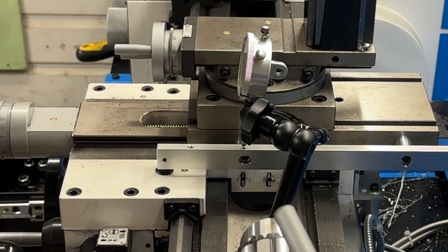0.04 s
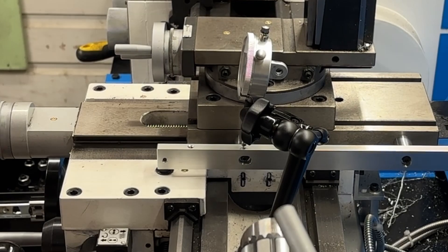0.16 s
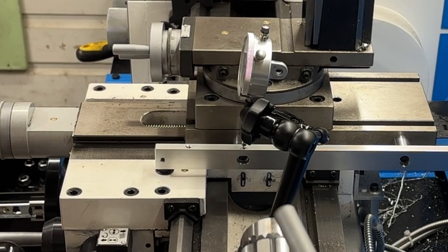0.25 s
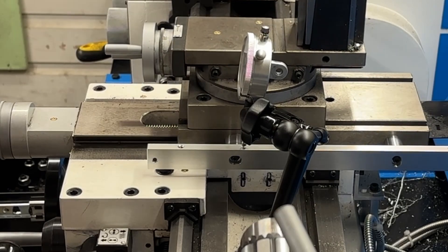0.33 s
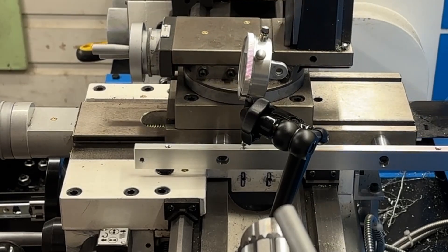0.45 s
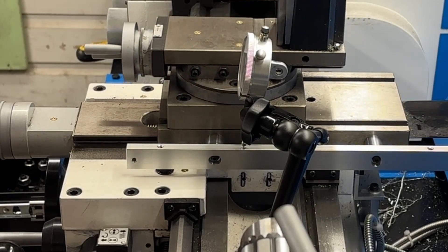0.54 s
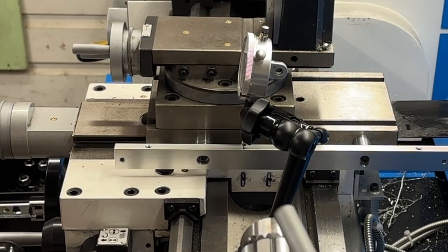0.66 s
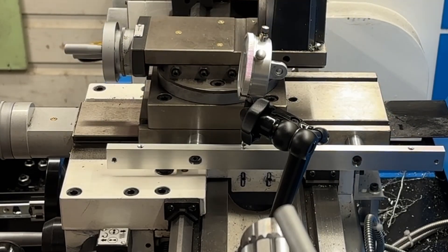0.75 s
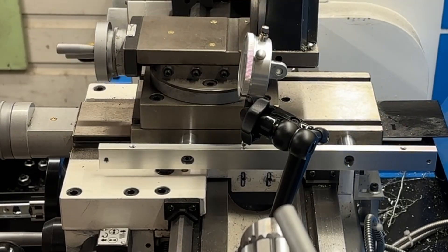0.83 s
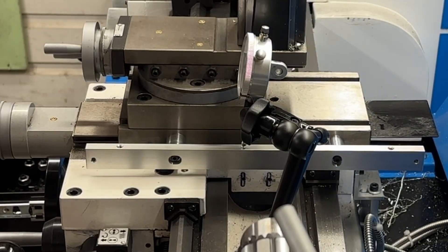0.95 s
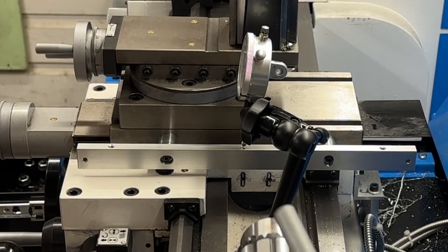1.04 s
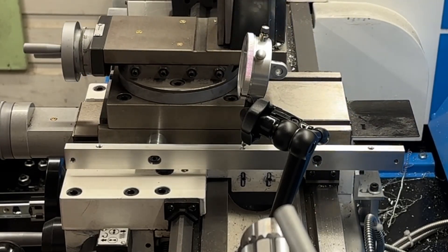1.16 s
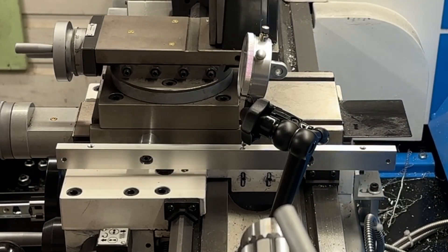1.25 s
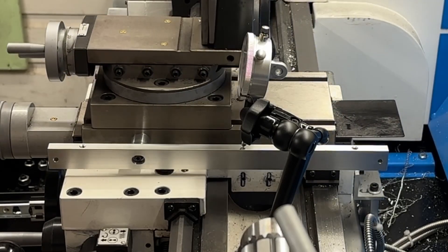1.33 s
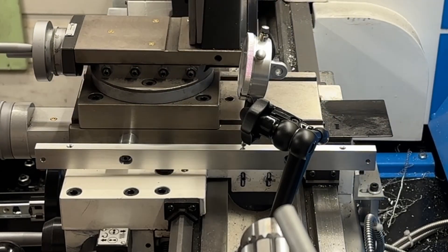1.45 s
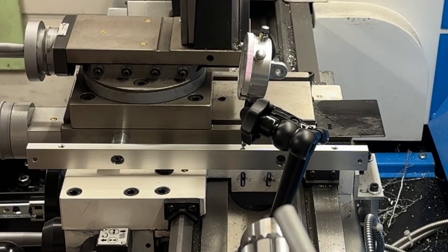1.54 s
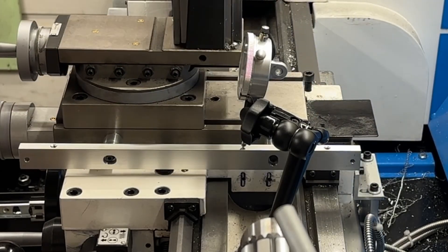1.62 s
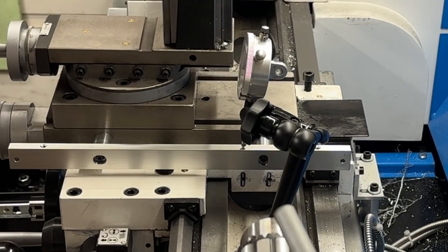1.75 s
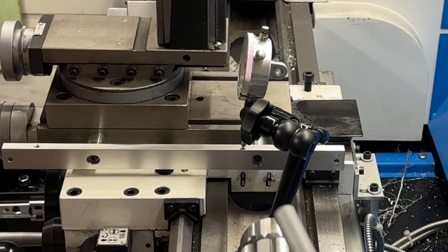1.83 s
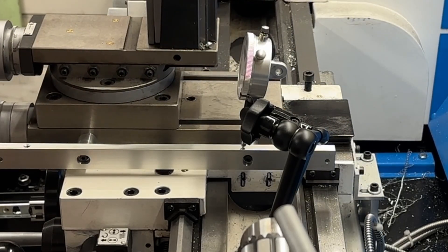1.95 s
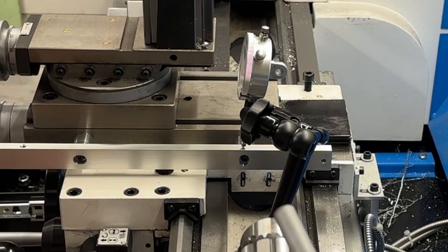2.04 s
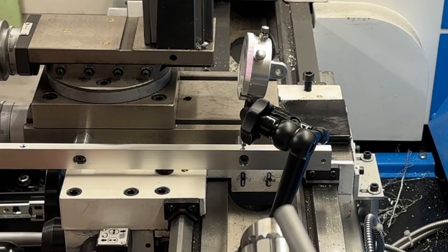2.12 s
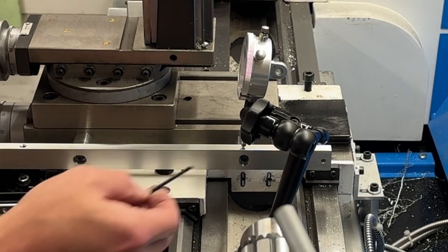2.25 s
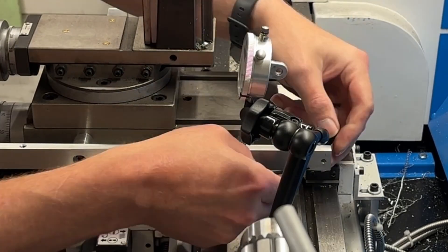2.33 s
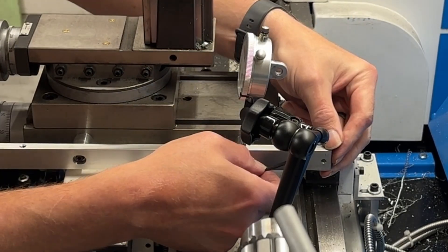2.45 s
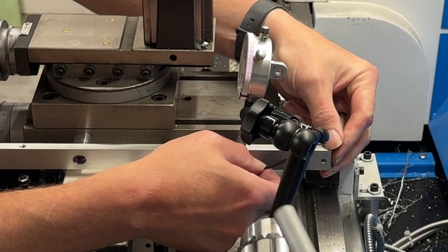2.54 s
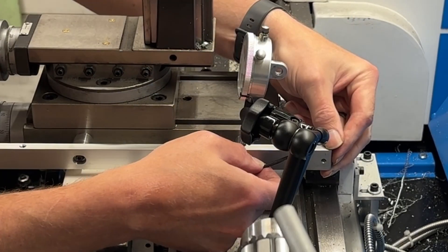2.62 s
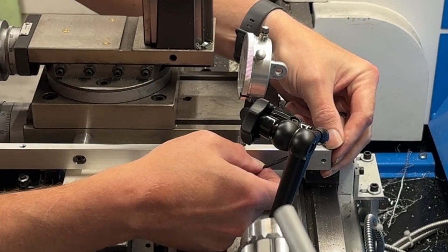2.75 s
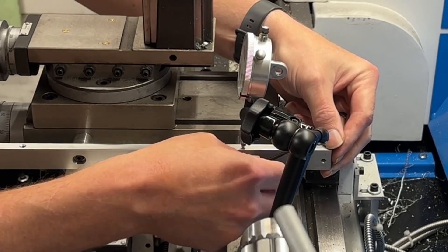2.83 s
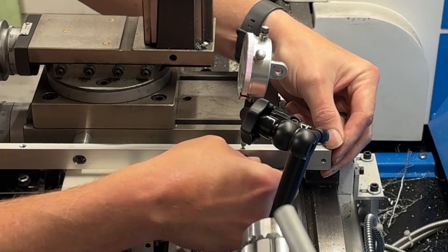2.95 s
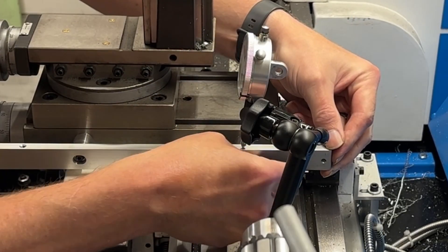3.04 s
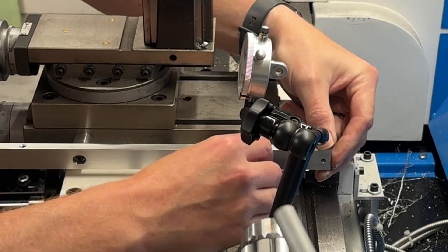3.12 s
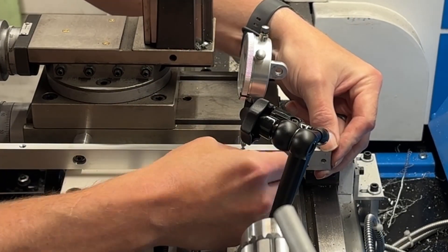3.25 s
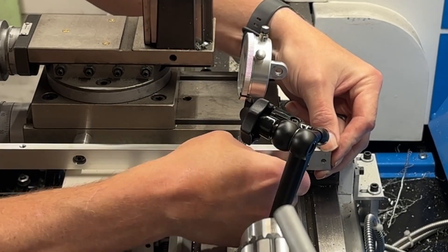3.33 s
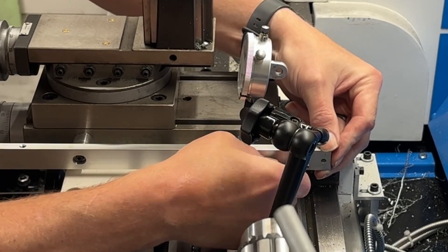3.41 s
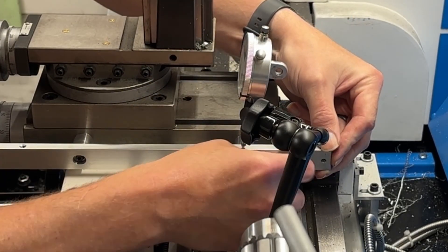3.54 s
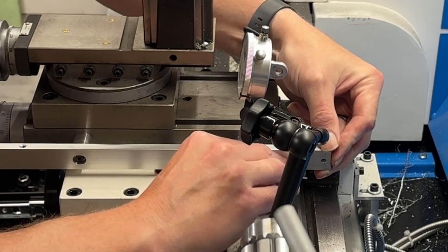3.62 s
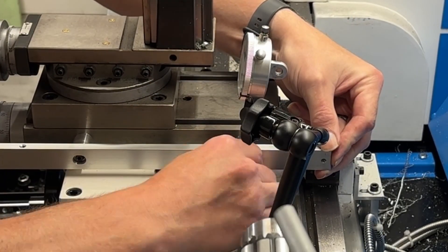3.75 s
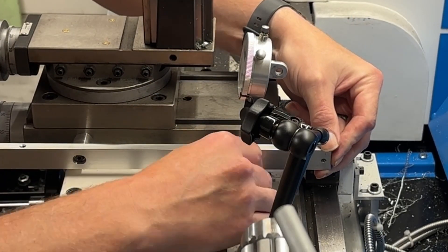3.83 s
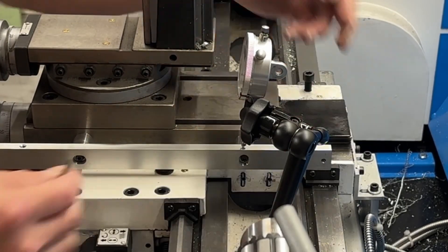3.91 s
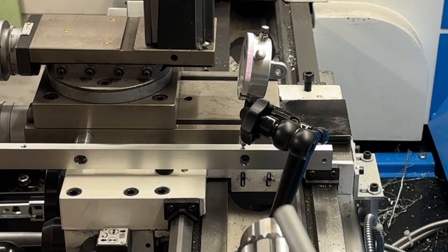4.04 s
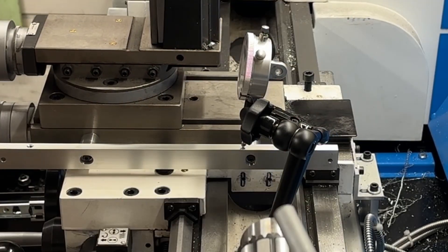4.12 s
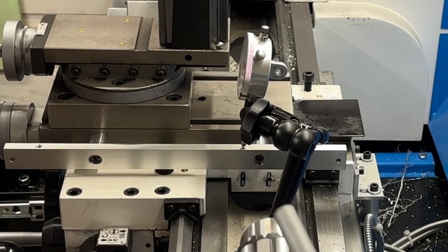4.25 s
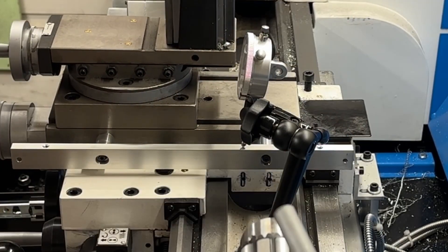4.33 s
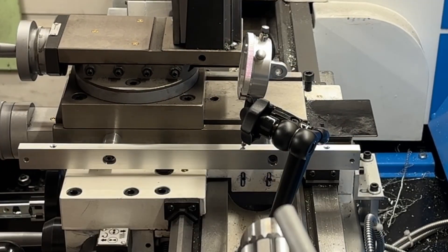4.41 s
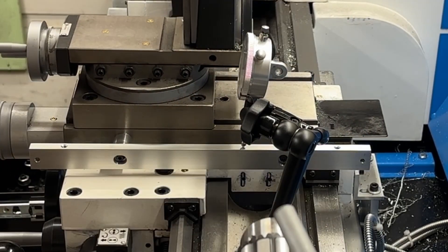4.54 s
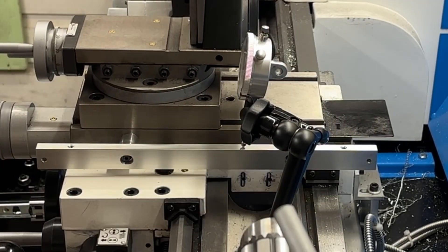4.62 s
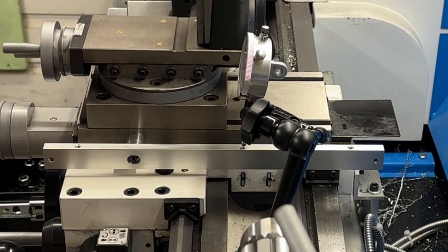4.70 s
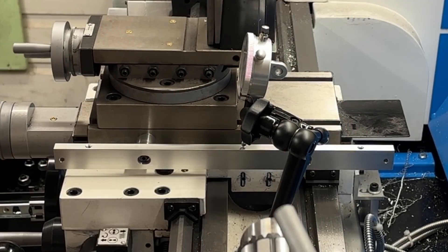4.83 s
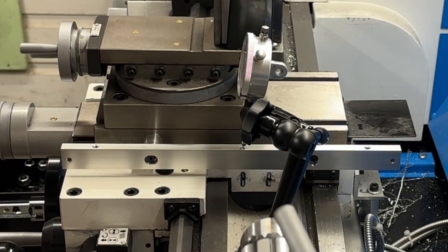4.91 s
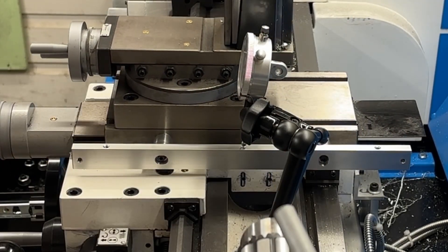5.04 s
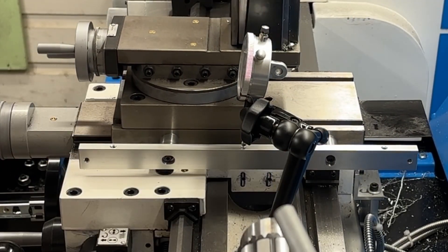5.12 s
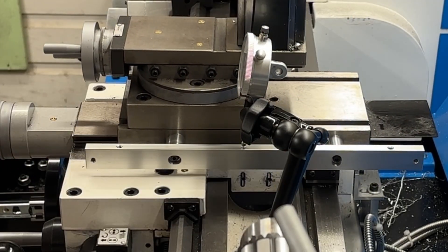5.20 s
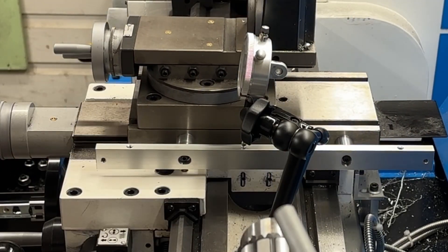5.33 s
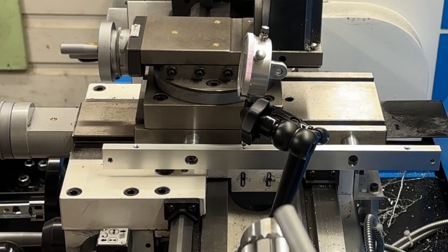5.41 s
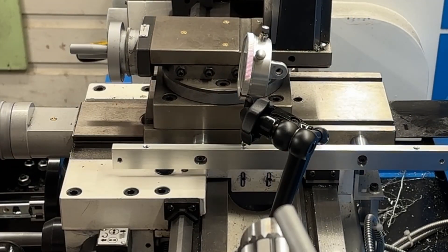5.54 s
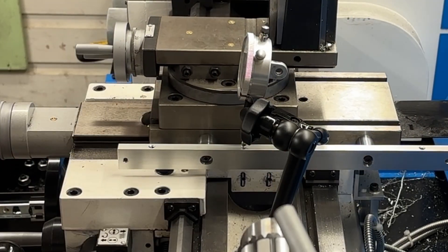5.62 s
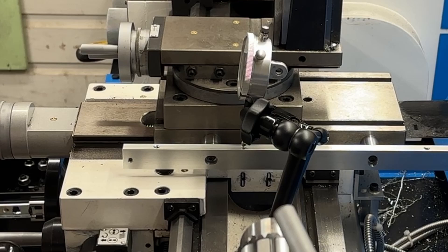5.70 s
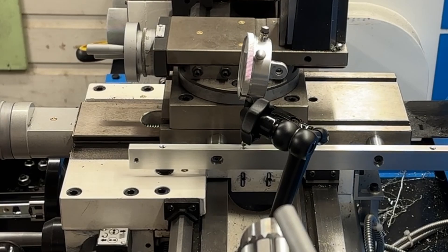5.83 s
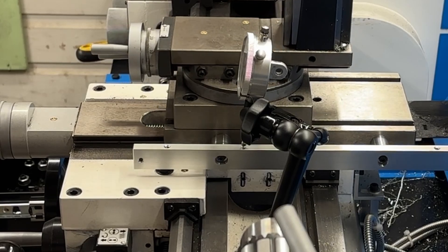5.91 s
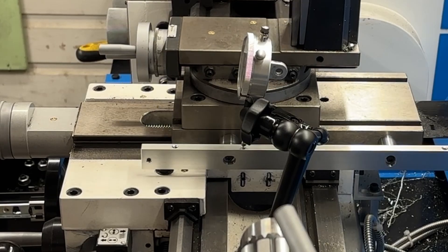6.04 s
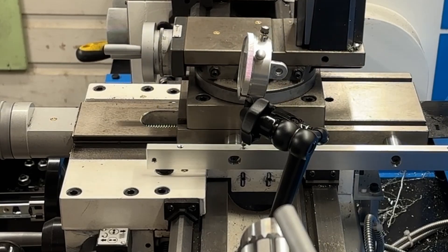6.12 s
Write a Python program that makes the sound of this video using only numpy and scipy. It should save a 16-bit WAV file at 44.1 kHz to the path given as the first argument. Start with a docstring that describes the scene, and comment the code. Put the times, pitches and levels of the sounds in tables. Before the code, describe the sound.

Close up in a small, dry workshop, a heavy lathe slide moves along its bed with a low, fast-fluttering rumble, faint rasp and small ticks. It stops, and a sharp steel clack bounces briefly with a short bright ring. Hands with a small key leave only tiny scuffs and ticks over a faint drone. Two small clicks, then the slide rumbles back, slightly grittier, with soft jolts.

```python
"""In a small workshop, close to the microphone, a lathe slide is moved along its ways.
Its drive rumbles through the iron bed in fast throbs; the ways rasp and hiss, with jolts and ticks.
Then a steel part clacks and bounces, and hands with a small key leave quiet scuffs and ticks.
The slide is moved back, crunching over grit. Shaped noise makes the friction and blows, sines the
steel ring and bed thuds; a low drone, a thin whine and faint air lie behind throughout."""
import sys
import numpy as np
from scipy import signal
from scipy.fft import rfft, irfft, next_fast_len
from scipy.io import wavfile
from scipy.ndimage import uniform_filter1d

SR = 44100
rng = np.random.default_rng(int(sys.argv[2]) if len(sys.argv) > 2 else 0)


def master_out(mix):
    """Clip the mix to full scale and print it as 16-bit PCM to the path in sys.argv[1]."""
    frames = np.transpose(np.atleast_2d(mix))
    ceiling = np.clip(frames, -1, 1)
    pcm = np.round(ceiling * 32767).astype(np.int16)
    wavfile.write(sys.argv[1], SR, pcm)


N = 271901
T = np.arange(N) / SR
LEAD_S = .04  # room for the swell ahead of the peak of a burst or thud

# spectrum of grit between the ways: [hz, relative level_db]
GRIT_SPECTRUM = [(2500, -15), (4200, 7), (6000, -3.5), (7500, 2), (9000, -14), (13000, -7), (15000, -7.5)]


def amp(db):
    """Decibels to gain."""
    return 10 ** (np.asarray(db) / 20)


def unit(x):
    """Scales to rms 1."""
    return x / np.sqrt(np.mean(x ** 2) + 1e-20)


def read(points, hz):
    """Reads a spectrum table on a log-frequency axis."""
    f, value = np.transpose(points)
    return np.interp(np.log(hz + 1), np.log(f + 1), value)


def bins(x):
    """The frequencies of the spectrum of x."""
    return np.fft.rfftfreq(x.shape[-1], 1 / SR)


def colour(x, db_at):
    """Filters x by a function from Hz to dB."""
    size = next_fast_len(x.shape[-1] + 2048)
    gain = amp(db_at(np.fft.rfftfreq(size, 1 / SR)))
    return irfft(rfft(x, size) * gain, size)[..., :x.shape[-1]]


def noise(db_at, size=N):
    """Stereo noise of rms 1, alike in both channels in the bass and more diffuse above."""
    # stereo width: [hz, side_minus_mid_db]
    stereo_width = [(30, -14), (100, -23), (200, -16), (380, -10), (690, -4.5), (1300, -1.5), (4300, -5.5),
                    (8000, -3), (14000, 0)]
    white = rng.standard_normal((2, next_fast_len(size)))
    hz = bins(white)
    mid, side = rfft(white)
    side = side * amp(read(stereo_width, hz))
    spectrum = np.array([mid + side, mid - side]) * amp(db_at(hz))
    return unit(irfft(spectrum, white.shape[1])[:, :size])


def wander(hz):
    """A smooth random curve of rms 1 that changes up to about hz times a second."""
    return unit(colour(rng.standard_normal(N), lambda f: -10 * np.log10(1 + (f / hz) ** 6)))


def add(mix, s, sound):
    """Mixes a sound in at time s."""
    part = mix[:, max(round(s * SR), 0):][:, :sound.shape[-1]]
    part += sound[..., :part.shape[1]]


def burst(db_at, rise, t60, lead, hold=0):
    """A puff of noise that swells to its peak after lead seconds, holds and dies away."""
    t = T[:12288] - lead
    swell = np.exp(-abs(t) / rise)
    decay = np.exp(-np.log(1000) * (t - hold).clip(0) / t60)
    return noise(db_at, size=len(t)) * np.where(t < 0, swell, decay)


def throb(turns, depth, sharp, uneven_db):
    """One swell for each turn of the drive, each of its own strength; mean power 1."""
    strengths = amp(uneven_db * np.clip(rng.standard_normal(512), -2, 2))
    strength = strengths[np.round(turns).astype(int) % 512]
    swell = unit(strength * np.exp(sharp * (np.cos(2 * np.pi * turns) - 1)))
    depth = np.clip(depth, 0, 1)
    return unit(1 - depth + depth * swell)


def steady(x, window, share):
    """Evens out the slow swells of a noise, as a constant push does."""
    power = uniform_filter1d((x ** 2).mean(0), int(window * SR))
    return unit(x / (abs(power) + 1e-6) ** (np.clip(share, 0, 1) / 2))


def slide(hz):
    """The broad resonances of the slide in dB; they colour its blows and scrapes."""
    # resonances of the slide: [centre_hz, width_hz, peak_db]
    resonances = [(646, 51.34, 6), (955, 97, 5), (1260, 70, 7.5), (1551, 300, 4.5), (2660, 67, 4),
                  (2820, 17, 6), (4340, 90, 7), (4950, 100, 6.5)]
    return sum(db / (1 + (2 * (hz - centre) / width) ** 2) for centre, width, db in resonances)


def steel_puff(tilt_db, rise, hold, t60):
    """The dead sound of steel meeting the slide, tilted duller or brighter by tilt_db per octave."""
    # spectrum of the contact: [hz, relative level_db]
    contact_spectrum = [(40, -7), (160, -0.5), (330, -1.5), (520, -7.5), (850, -2), (1600, -2), (3000, -2),
                        (4800, -4.5), (5800, -8.5), (9000, -14), (13500, -18), (15500, -37)]

    def body(f):
        return read(contact_spectrum, f) + slide(f) + tilt_db * np.log2(f.clip(400) / 2000)
    return burst(body, rise, t60, LEAD_S, hold)


def thud(hz, length, lead):
    """The bed gives under a push and swings back once or twice, most widely after lead seconds."""
    t = T[:4096] - lead
    return np.exp(-(t / length) ** 2) * np.cos(2 * np.pi * hz * t + rng.uniform(0, 2 * np.pi))


def room():
    """The quiet workshop: a low drone and a thin whine under faint air; the bass dips once, briefly."""
    # spectrum of the air: [hz, relative level_db]
    air_spectrum = [(12, -36), (20, -12), (56, -1), (85, 0), (195, -15.5), (824, -28), (1320, -35.5),
                    (3390, -40), (3900, -37), (5590, -43), (7800, -42), (9740, -53), (11200, -46.5),
                    (12900, -46), (15200, -60.5)]
    dip_s, dip_length_s, dip_db = 2.45, .14, -8
    drone_hz, drone_waver_hz, whine_hz = 71, 13, 3900
    air = amp(-71.0) * noise(lambda f: read(air_spectrum, f))
    drone = amp(-71.5) * wander(drone_waver_hz) * np.cos(2 * np.pi * drone_hz * T) * np.sqrt(2)
    whine = amp(-102) * wander(80) * np.cos(2 * np.pi * whine_hz * T)
    low = colour(air, lambda f: -20 * np.log10(1 + (f / 200) ** 4))
    dip = amp(dip_db * np.exp(-((T - dip_s) / dip_length_s) ** 2))
    return air - low + dip * (low + drone) + whine


def ticks(rows, rise, t60):
    """Small impacts on the slide, each a puff of noise in a band around its own pitch."""
    out = np.zeros((2, N))
    for s, db, hz, octaves in rows:
        def hump(f):
            return slide(f) - 20 * np.log10(1 + (np.log2(f.clip(1) / hz) / octaves) ** 4 / 2)
        # the peak comes one rise after s
        add(out, s + rise - LEAD_S, amp(db) * burst(hump, rise, t60, LEAD_S))
    return out


def crunches(tilt_db=3.0, rise=0.0033, t60=0.025):
    """Grit is crushed between the ways in short, bright puffs of noise."""
    # patches of grit on the way back: [start_s, level_db, length_s]
    patches = [(4.177, -73, 0.023), (4.348, -73, 0.01), (4.379, -71, 0.013), (4.413, -72, 0.021),
               (4.511, -68.5, 0.015), (4.57, -74, 0.024), (4.662, -83, 0.032), (4.812, -75, 0.011),
               (5.29, -77, 0.0057), (5.358, -72.5, .004)]

    def bright(f):
        return read(GRIT_SPECTRUM, f) + tilt_db * np.log2(f.clip(2000) / 2000)
    out = np.zeros((2, N))
    for s, db, length in patches:
        add(out, s - LEAD_S, amp(db) * burst(bright, rise, t60, LEAD_S, length))
    return out


def scuffs():
    """Short drags of handled steel on the slide: a soft start, a level rub, a quick end."""
    # drags: [start_s of the level rub, level_db, length_s, tilt_db_per_octave]
    drags = [(0.106, -80, .01, 4.5), (0.158, -81, .02, 4.5), (0.724, -69.5, 0.014, -4.5),
             (2.107, -41.5, 0.017, -6), (2.215, -71.5, 0.02, -2), (2.262, -61.5, .013, -0.5),
             (2.291, -71, .018, 3), (2.313, -48.5, .012, -1.5), (2.391, -82.5, .01, 7),
             (3.986, -65.5, 0.027, 7), (4.019, -51, 0.0037, -0.8), (4.045, -45.5, 0.0041, -1.5),
             (4.06, -69.5, 0.0082, 6)]
    rise_s, t60_s = .0036, 0.034
    out = np.zeros((2, N))
    for s, db, length, tilt_db in drags:
        add(out, s - LEAD_S, amp(db) * steel_puff(tilt_db, rise_s, length, t60_s))
    return out


def scrape():
    """A dry patch on the ways sings: a narrow band of friction noise that sinks in pitch."""
    start_s, end_s, level_db = 0.35, .78, -89.5
    start_hz, sag_hz_per_s = 4900, 2900
    hz = start_hz - sag_hz_per_s * (T.clip(start_s, end_s) - start_s)
    fade = np.clip(np.minimum(T - start_s, end_s - T) / 0.027, 0, 1)
    roughness = wander(490) * amp(2.5 * wander(90))
    return amp(level_db) * fade * unit(roughness * np.cos(2 * np.pi * np.cumsum(hz) / SR))


def bumps(hz=130, length=0.006, level_db=-3):
    """The slide catches and jolts the bed, which answers with a short low swing."""
    # jolts: [peak_s, level_db before the common level_db is added]
    jolts = [(0.226, -41.5), (0.373, -29.5), (0.41, -26.5), (1.095, -28), (1.203, -30), (1.875, -40),
             (4.072, -38), (4.187, -30.5), (4.275, -26), (4.388, -27.5), (4.762, -26), (5.047, -29.5),
             (5.183, -29.5), (6.018, -33)]
    out = np.zeros((2, N))
    for s, db in jolts:
        add(out, s - LEAD_S, amp(db + level_db) * thud(hz * rng.uniform(.85, 1.0), length, LEAD_S))
    return out


def clacks():
    """A hard blow of a steel part and its ever shorter bounces; it rings the steel and thumps the bed."""
    # blow and bounces: [peak_s, level_db]
    blows = [(2.1305, -23.5), (2.137, -27.5), (2.150, -25), (2.1545, -24.5)]
    # ring of the steel: [pitch_hz, level_db relative to ring_db, t60_s undamped, left_channel_lead_rad]
    steel_modes = [(6864, -8, .065, .3), (8940, 2, .04, -2.0), (11440, -18, .06, -.5), (12306, -7, .042, 0)]
    rise_s, hold_s, t60_s = .0011, 0.00092, 0.051
    # each bounce is shorter and brighter than the last (tilts in dB per octave)
    shortening, first_tilt_db, bounce_tilt_db = 0.85, -0.22, .5
    strike_s, ring_db, damped_s, thud_db = 2.128, -15.5, .034, -29.5
    out = np.zeros((2, N))
    for bounce, (s, db) in enumerate(blows):
        tilt_db = first_tilt_db + bounce_tilt_db * bounce
        blow = steel_puff(tilt_db, rise_s, hold_s, t60_s * shortening ** bounce)
        add(out, s - LEAD_S, amp(db) * blow)
    t = T[:8192]
    # the ring swells in a few milliseconds and is damped once the part comes to rest
    free = (1 - np.exp(-(t / .0025) ** 2)) * np.exp(-(t / damped_s) ** 4)
    for hz, db, t60, left_lead in steel_modes:
        ports = np.sin(2 * np.pi * hz * t + np.array([[left_lead], [0]]))
        decay = np.exp(-np.log(1000) * t / t60)
        add(out, strike_s, amp(ring_db + db) * ports * decay * free)
    # the heavy bed answers a little later
    add(out, strike_s + 0.01 - LEAD_S, amp(thud_db) * thud(hz=150, length=.009, lead=LEAD_S))
    return out


def move(push, friction, hiss_colour, upper_hz, hollow_s, hollow_length, free_s, throb_s,
         rumble_depth, rasp_depth, hiss_depth):
    """The drive shakes the bed and rasps at each throb; friction follows the push and drifts along the way."""
    # nominal speed of the drive: [time_s, throbs_per_s]
    drive_speed = [(0.3, 33), (1.0, 35.5), (1.5, 33.5), (2.0, 28), (4.2, 29.6), (4.75, 30.5), (5.2, 28.9),
                   (5.7, 28.7)]
    # spectra of bed rumble, drive rasp and rub of the ways: [hz, relative level_db]
    bed_spectrum = [(12, -55.5), (20, -20), (48, -16.5), (102, -2), (124, 1.5), (162, -6.5), (211, -5.5),
                    (325, -23), (374, -22.5), (494, -38.5), (560, -41.5), (730, -64.5), (1230, -120)]
    rasp_spectrum = [(300, -16), (450, 0), (550, -4), (680, 0), (1000, -4.5), (1300, -13.5), (2000, -29),
                     (4000, -34)]
    rub_spectrum = [(800, -19), (1200, 3), (1600, 2), (2100, 0), (2700, -11.5), (3500, -14.5), (6000, -31)]
    # how far rasp, rub and hiss follow the push: [share, dB per dB]
    follow_shares = [0.68, 0.41, 0.34]
    reference_push_db, freeing_s = -42, .05
    s, push_db = np.transpose(push)
    rumble_db = np.interp(T, s, push_db)
    moving = np.clip(np.minimum(T - s[0], s[-1] + .02 - T) / .02, 0, 1)
    elapsed = (T - s[0]).clip(0)
    free = .5 + .5 * np.tanh((T - free_s) / freeing_s)
    rasp_db, rub_db, hiss_db = (
        db + follow * (rumble_db - reference_push_db) - fade * elapsed - drop * free
        for follow, (db, fade, drop) in zip(follow_shares, friction))
    # part of the way along, the bed sounds hollow: its upper rumble rises
    upper_db = -9.5 + 8.5 * np.exp(-((T - hollow_s) / hollow_length) ** 2)
    turns = np.cumsum(np.interp(T, *np.transpose(drive_speed))) / SR
    # a throb falls on throb_s, give or take the unsteadiness of the drive
    turns -= np.interp(throb_s, T, turns)
    turns += .08 * wander(25)

    def low_bed(f):
        return read(bed_spectrum, f) - 10 * np.log10(1 + (f / 175) ** 8)

    def upper_bed(f):
        resonance = 7 / (1 + ((f - upper_hz) / 35) ** 2)
        return read(bed_spectrum, f) - 10 * np.log10(1 + (175 / f.clip(1)) ** 8) + resonance
    low = steady(noise(low_bed), window=0.054, share=.85)
    upper = steady(noise(upper_bed), window=0.054, share=0.61)
    bed = low + amp(upper_db) * upper
    rumble = amp(rumble_db) * bed * throb(turns, rumble_depth, sharp=1.7, uneven_db=1.8)
    # each throb presses the faces together: they scrape in short, grainy strokes
    strokes = throb(turns, rasp_depth, sharp=2.8, uneven_db=6.0) * amp(2.0 * wander(140))
    rasp = amp(rasp_db) * noise(lambda f: read(rasp_spectrum, f) + slide(f)) * strokes
    rub_noise = noise(lambda f: read(rub_spectrum, f) + 0.13 * slide(f))
    rub = amp(rub_db) * rub_noise * unit(strokes ** 0.72)
    grain = throb(turns, hiss_depth, sharp=1.8, uneven_db=4.5) * amp(3 * wander(160))
    hiss = amp(hiss_db) * noise(lambda f: read(hiss_colour, f)) * grain
    return moving * (rumble + rasp + rub + hiss)


def scene():
    """Everything on the lathe, with the faint answer of the walls and the room behind."""
    # how hard the hand drives the slide, out and back: [time_s, rumble_db]
    push_out = [(0.1, -63.5), (0.12, -75.5), (0.356, -39.5), (0.874, -46.5), (0.918, -43.5), (1.114, -44.5),
                (1.218, -40.5), (1.246, -41.5), (2.01, -46), (2.06, -66.5)]
    push_back = [(4.04, -70), (4.06, -57.5), (4.2, -38.5), (4.25, -55), (4.27, -41.5), (4.7, -44),
                 (4.75, -41), (5.6, -48), (5.77, -59.5), (5.82, -46.5), (5.87, -55), (6.03, -44.5),
                 (6.17, -51)]
    # friction, rows rasp, rub, hiss: [level_db at reference push, fade_db_per_s, drop_db once running free]
    friction_out = [(-73.5, -1.5, 2.5), (-76.5, 2, 7.5), (-82.5, 8, -3)]
    friction_back = [(-71.5, 0.88, 6.2), (-78.5, 2.7, 0.8), (-81.5, 8.4, 1)]
    # hiss of the ways on the move out: [hz, relative level_db]
    ways_spectrum = [(2000, -20.5), (3000, 2.5), (4400, 4.5), (5500, -3), (7500, -2.5), (9000, -16.5),
                     (13000, -15)]
    # clicks of steel and grit on the slide: [start_s, level_db, pitch_hz, spread_octaves]
    grit_ticks = [(0.224, -64.5, 5130, 0.37), (0.244, -67.5, 6230, 1.1), (0.746, -54, 1440, 1.08),
                  (0.918, -67, 4030, 0.49), (1.106, -57.5, 1900, 1.01), (1.368, -52.5, 1760, 0.92),
                  (1.398, -52.5, 1630, 0.88), (1.400, -55, 4700, 0.26), (1.484, -64.5, 1810, 1.05),
                  (1.523, -65, 1510, 1.06), (1.612, -72, 2500, 1.2), (1.871, -53, 1820, 0.91),
                  (2.859, -77, 2550, .5), (3.034, -70.5, 1410, 0.53), (3.035, -65, 9060, 0.57),
                  (3.036, -69, 3570, 0.021), (3.222, -65, 6006, 1.3), (4.137, -65.5, 3447, 0.31),
                  (4.197, -60.5, 1200, 0.71), (4.316, -66.5, 9350, 1.2), (4.486, -58.5, 900, 1.3),
                  (4.542, -56, 7250, .2), (4.749, -61.5, 6500, .7), (4.776, -63, 9500, 0.97),
                  (4.84, -54.5, 5140, 0.36), (4.843, -60, 1300, 0.77), (5.05, -62, 5960, 1.5),
                  (5.158, -65, 1500, 0.44), (5.321, -65.5, 4500, 0.69), (5.458, -61, 6540, 0.74),
                  (5.811, -67, 2400, 0.52), (5.942, -72, 9000, 1.2)]
    # hollow knocks of the drive: [start_s, level_db, pitch_hz, spread_octaves]
    drive_knocks = [(0.202, -66, 550, 0.69), (0.811, -61, 920, 0.34), (0.917, -47.5, 770, .14),
                    (4.843, -59.5, 690, 0.42), (5.112, -61.5, 620, 0.22), (5.185, -59.5, 610, 0.29),
                    (5.323, -59.5, 730, .33), (5.356, -51.5, 586, 0.29), (5.46, -62.5, 800, 1.1),
                    (5.532, -59.5, 650, 0.19)]
    out = move(push_out, friction_out, ways_spectrum, upper_hz=208, hollow_s=.8, hollow_length=.66,
               free_s=1.52, throb_s=1.372, rumble_depth=.35, rasp_depth=.45, hiss_depth=.15)
    back = move(push_back, friction_back, GRIT_SPECTRUM, upper_hz=274.4, hollow_s=5.363, hollow_length=0.49,
                free_s=5.56, throb_s=4.848, rumble_depth=0.37, rasp_depth=0.58, hiss_depth=0.71)
    small = ticks(grit_ticks, rise=.0014, t60=0.032) + ticks(drive_knocks, rise=.0014, t60=0.05) + crunches()
    lathe = out + back + scrape() + bumps() + clacks() + scuffs() + small
    tail = burst(lambda f: -10 * np.log10(1 + (f / 900) ** 2), rise=.004, t60=.25, lead=0.0097)
    walls = signal.fftconvolve(lathe, tail / np.linalg.norm(tail[0]), axes=1)[:, :N]
    return lathe + amp(-51.5) * walls + room()


def record(dry):
    """Microphone colour and left-right balance, then the band limit."""
    # colour of the microphone: [hz, gain_db]
    mic_colour = [(9300, 0), (9900, -11), (10700, -11), (11300, 0)]
    # stereo balance: [hz, left_minus_right_db]
    stereo_balance = [(60, -0.5), (200, -2), (400, -1), (1200, -1), (2400, 2.34), (4400, 1.5), (9000, 0.1)]
    edge_hz = 15400
    halves = np.array([[.5], [-.5]])
    heard = colour(dry, lambda f: read(mic_colour, f) + halves * read(stereo_balance, f))
    band_limit = signal.firwin(255, edge_hz, window=("kaiser", 9), fs=SR)
    return signal.oaconvolve(heard, band_limit[None], "same", axes=1)


dry = scene()
out = record(dry)
master_out(out)
```